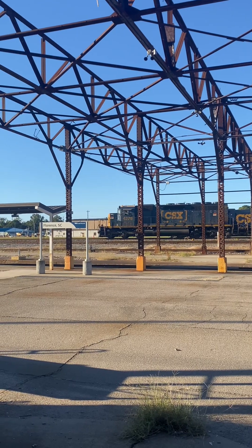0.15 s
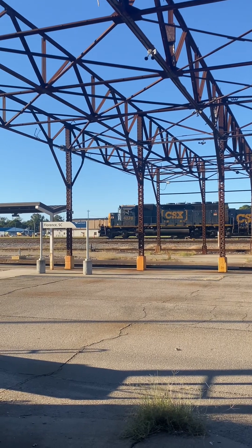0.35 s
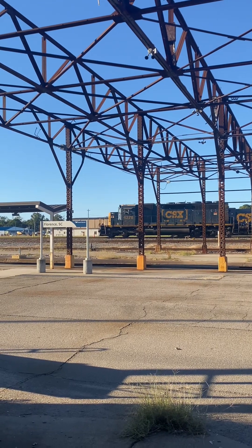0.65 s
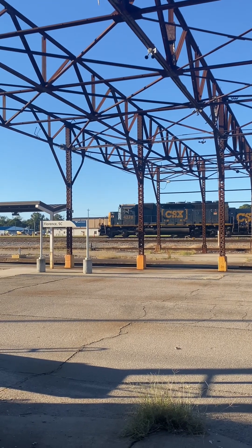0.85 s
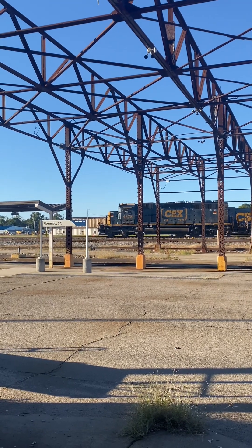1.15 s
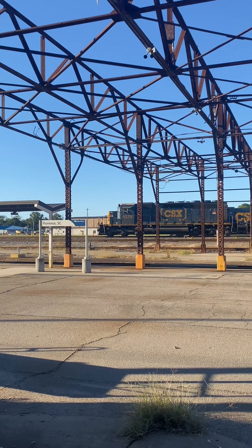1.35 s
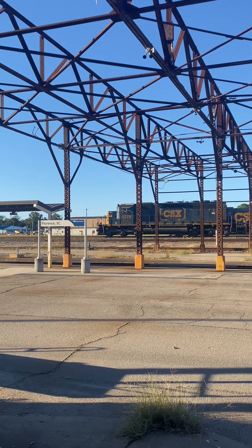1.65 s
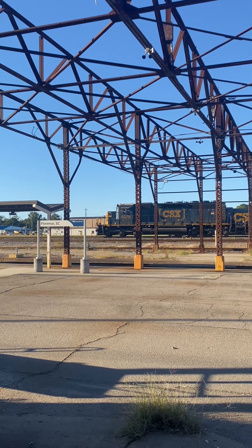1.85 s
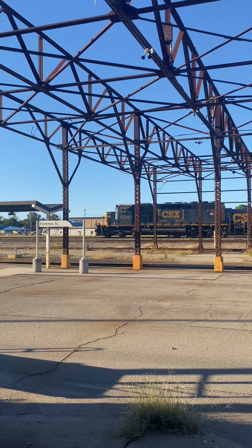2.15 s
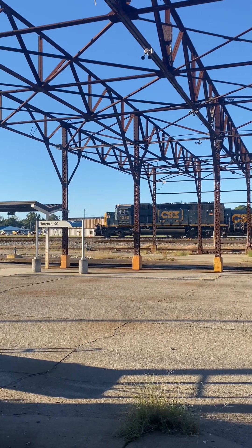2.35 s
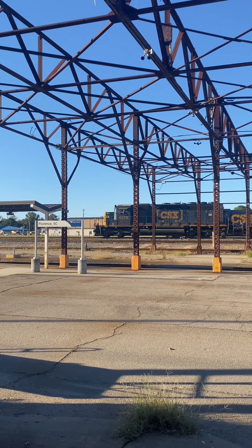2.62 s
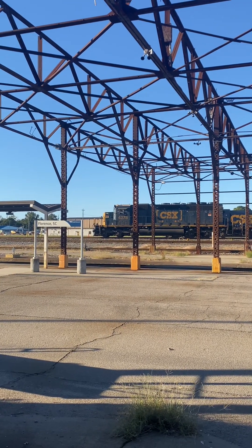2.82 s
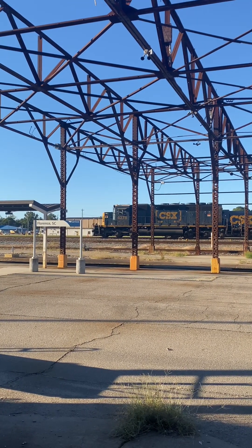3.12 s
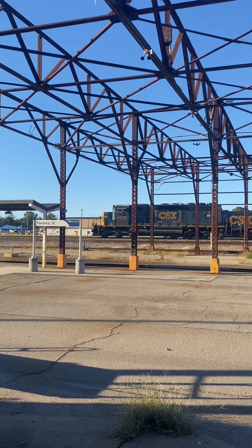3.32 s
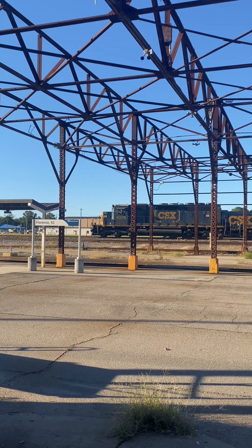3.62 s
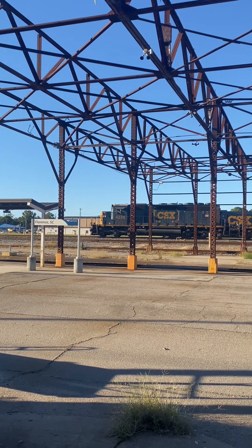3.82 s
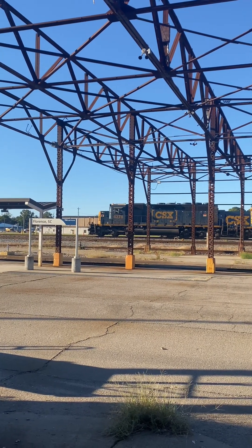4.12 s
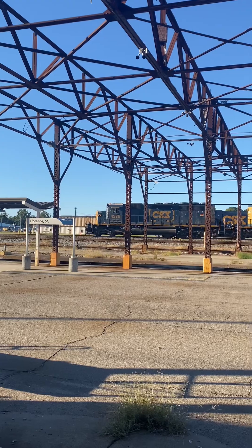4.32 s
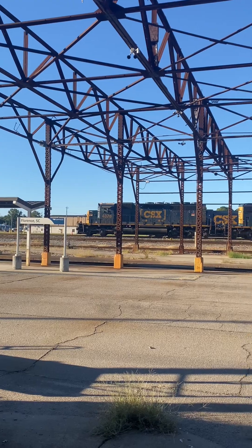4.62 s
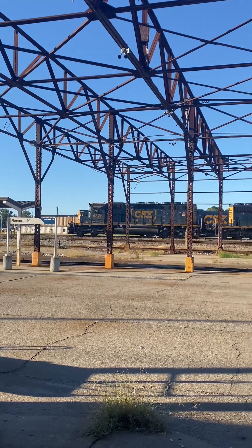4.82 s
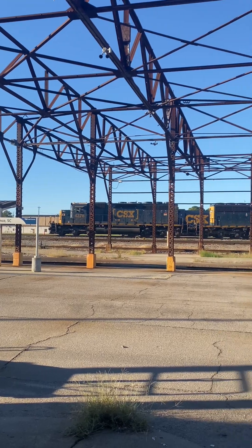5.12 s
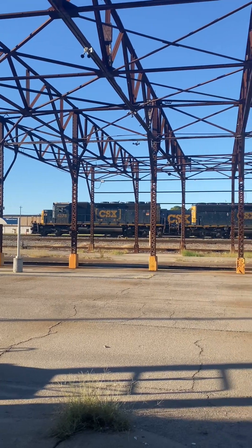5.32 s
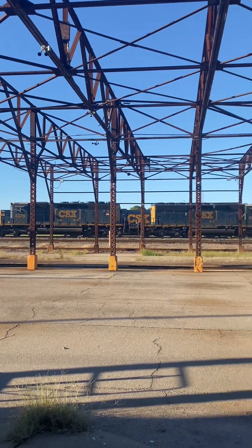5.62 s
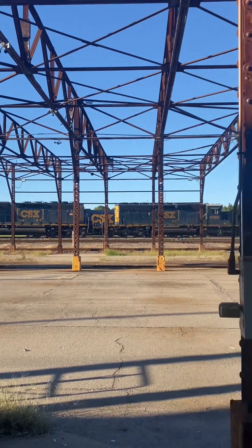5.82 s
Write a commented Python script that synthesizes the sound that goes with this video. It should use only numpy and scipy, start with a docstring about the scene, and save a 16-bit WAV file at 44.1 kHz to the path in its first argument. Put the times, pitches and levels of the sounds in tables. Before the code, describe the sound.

Diesel locomotives idle across an open rail yard, a low throb under a soft roar and a faint, fluttering high whine. Steel scrapes faintly at first, and wind buffets the hand-held phone microphone in gusts. About four seconds in, the bass drops away and an air valve vents once with a brief hoot and an echo. Steel then knocks, scrapes and squeaks, the valve puffs softly twice, and the throb returns.

```python
"""Diesel locomotives idle across an open rail yard: crankshaft orders throb under a roar and gear whines.
From the start steel scrapes and squeaks faintly; wind buffets the two microphone ports of a hand-held
phone, now and then in gusts. Near 4 s the bass drops away and an air valve vents once, its pipe hooting.
Its echo dies away; steel scrapes, knocks and squeaks, the valve puffs twice and the throb returns."""
import sys
import numpy as np
from scipy import signal
from scipy.fft import rfft, irfft, next_fast_len
from scipy.io import wavfile
from scipy.ndimage import uniform_filter1d, minimum_filter1d

SR = 44100
rng = np.random.default_rng(int(sys.argv[2]) if len(sys.argv) > 2 else 0)


def store_pcm(level_fs):
    """Save levels as 16-bit WAV."""
    pcm = np.round(np.clip(level_fs, -1, 1) * 32767).astype(np.int16)
    wavfile.write(sys.argv[1], SR, np.atleast_2d(pcm).T)


N = 263277

# idling speed: time_s, speed_rpm
CRANK_SPEED = [(0, 317.8), (1.5, 318.2), (3.6, 321.7), (4.8, 320.2), (5.97, 318)]
def crank_angle():
    """Phase is the integral of speed: the crankshaft angle in radians."""
    return 2 * np.pi * np.cumsum(curve(CRANK_SPEED) / 60) / SR


# exhaust tones: cycles_per_turn, level_db
EXHAUST_ORDERS = [(8, -22), (9, -39), (12, -38), (13, -40), (15, -22), (16, -33), (17, -33.5), (18, -38),
                  (19, -39), (22, -47), (24, -48), (25, -46), (29, -45), (31, -43)]
# the bass drops away around the air blast and returns: time_s, gain_db
BASS_GAIN = [(0, -0.5), (3.6, 1), (3.8, -6), (3.92, -24), (4.25, -8), (4.65, -14), (4.85, -5.5),
             (5.05, -1), (5.97, 1.5)]
def exhaust():
    """Harmonic series: uneven firing repeats once a turn, giving tones at multiples of the crank rate."""
    strong_firing_s, stack_order = .08, 15
    angle = crank_angle()
    angle -= angle[round(strong_firing_s * SR)]
    waver, tones = wander(5.2), 0
    for order, db in EXHAUST_ORDERS:
        level = gain_of(db + .15 * np.roll(waver, order * SR // 7))
        lag = .13 * (order - stack_order) ** 2  # tones away from the stack resonance lag
        tones += level * np.cos(order * angle - lag + .25 * rng.standard_normal())
    return np.sqrt(2) * tones * gain_of(curve(BASS_GAIN))


# noise of fans, intake and casing: frequency_hz, density_db
ROAR_SPECTRUM = [(30, -33), (60, 9), (110, -3.5), (300, 1), (600, -7), (1300, -11.5), (1700, -17),
                 (2150, -15), (2800, -21), (4200, -24.5), (5600, -31), (7000, -36.5), (9000, -42),
                 (11500, -48), (15000, -60.5)]
# its rise and fall: time_s, level_db
ROAR_LEVEL = [(0, -34), (1.5, -33.5), (2, -35.5), (3.4, -34), (3.8, -37.5), (4.5, -39.5), (5, -32),
              (5.5, -34), (5.97, -36.5)]
# hollows of the casing: pitch_hz, bandwidth_hz, gain_db
CASING_MODES = [(2150, 96, -28), (2756, 330, -26.5), (3500, 200, -30), (5390, 370, -36.5)]
def roar():
    """Cavity resonance: broadband machine noise rings a few hollows of the casing."""
    noise = coloured(ROAR_SPECTRUM, patchy_db=1.5)
    rings = resonances(noise, CASING_MODES, passes=2)
    return (noise + rings) * gain_of(curve(ROAR_LEVEL) + .73 * wander(7.1))


# the blower whine comes forward in short chirps: time_s, level_db
WHINE_CHIRPS = [(.05, -38), (.22, -48), (.35, -38), (.5, -42), (.63, -42), (.75, -44), (.95, -44.5),
                (1.08, -45), (1.2, -40), (1.38, -41.5), (1.58, -36.5), (1.76, -37.5), (2.0, -39.5),
                (2.25, -48.5), (2.6, -39), (2.75, -44), (2.89, -37.5), (3.07, -36), (3.29, -32),
                (3.43, -42), (3.54, -37.5), (4.45, -41), (4.73, -35), (4.94, -36), (5.08, -43), (5.29, -39),
                (5.46, -43), (5.7, -40), (5.921, -40)]
# the highest whine: time_s, level_db
UPPER_WHINE_LEVEL = [(0, -54), (.3, -57), (.55, -52), (.72, -58), (1.28, -59), (1.45, -55.5), (1.78, -53),
                     (1.9, -60), (2.2, -56.5), (2.55, -55.5), (2.72, -58), (2.88, -54), (3.05, -57),
                     (3.16, -52.5), (3.45, -60), (4.8, -56), (5.55, -58), (5.7, -52.5), (5.97, -55)]
def whines():
    """Modulation: tones geared to the crankshaft flutter in level and phase as they cross moving air."""
    blower_hz, steady_db, chirp_s = 2101, -53, .036
    angle = blower_hz * crank_angle() / (curve(CRANK_SPEED).mean() / 60)
    chirps = swells(*np.transpose(WHINE_CHIRPS), chirp_s, chirp_s)
    chirps = uniform_filter1d(chirps, size=round(.08 * SR))
    level = np.hypot(gain_of(steady_db), chirps)
    flutter = unit_rms(gain_of(2.2 * wander(45)))
    out = np.sqrt(2) * level * flutter * np.sin(angle + .45 * wander(25))
    for ratio, db in (.4, -57), (2.126, curve(UPPER_WHINE_LEVEL)):  # companions below and above
        flutter = gain_of(3.2 * wander(16))
        out += gain_of(db) * unit_rms(flutter * np.sin(ratio * angle + 1.2 * wander(18)))
    return out


# the valve cracks, pops open and shuts: time_s, level_db, hiss_share
VALVE_BLAST = [(3.825, -64, 0.93), (3.84, -48, 0.99), (3.87, -34.5, 0.93), (3.945, -26, 0.7),
               (3.949, -17.5, 0.3), (3.99, -15.5, 0.04), (4.04, -19.5, 0.4), (4.07, -25, 0.4),
               (4.12, -32.5, 0.1), (4.2, -39.5, 0.2), (4.3, -91, 0.2)]
# valve wide open: frequency_hz, density_db
RUSH_SPECTRUM = [(300, -17.5), (700, -8.5), (900, -0.5), (1150, -1.5), (1500, -8), (2000, -10), (2300, -9),
                 (2720, -4.5), (3300, -10), (5500, -14.5), (7500, -14), (12000, -33), (15000, -38.5)]
# valve just cracked: frequency_hz, density_db
HISS_SPECTRUM = [(300, -20.5), (1300, -5.5), (2800, -5), (4200, -5), (5800, -2), (9000, -9), (12000, -18.5),
                 (15000, -28)]
# resonances of the pipe: pitch_hz, bandwidth_hz, gain_db
PIPE_MODES = [(2690, 50, -17.5), (2010, 130, -7.5)]
# small leaks: time_s, level_db
VALVE_PUFFS = [(.35, -54.5), (4.77, -47.5), (5.415, -50)]
def air_valve():
    """Turbulent jet noise: a narrow gap hisses, a wide one gives a fuller rush that rings the pipe."""
    level_db, hiss_share = curve(VALVE_BLAST)
    level = gain_of(level_db) * (level_db > -60)  # silent while shut
    rush = coloured(RUSH_SPECTRUM, patchy_db=-.5)
    rush = unit_rms(rush + resonances(rush, PIPE_MODES))
    puffs = swells(*np.transpose(VALVE_PUFFS), rise_s=.015, fall_s=.047)
    hiss = (np.sqrt(hiss_share) * level + puffs) * coloured(HISS_SPECTRUM, patchy_db=1.5)
    return (hiss + np.sqrt(1 - hiss_share) * level * rush) * gain_of(.25 * wander(60))


# a sinking tone at the height of the blast: time_s, pitch_hz, level_db
HOOT_GLIDE = [(3.944, 1216, -60), (3.949, 1182, -23.5), (3.966, 1102, -36), (3.977, 1004, -20),
              (3.993, 980, -21.5), (4.005, 925, -26), (4.05, 900, -60)]
def pipe_hoot():
    """Pipe resonance: the valve pipe sounds one tone, made breathy by random phase modulation."""
    hz, db = curve(HOOT_GLIDE)
    phase = 2 * np.pi * np.cumsum(hz) / SR + .8 * wander(60)
    return np.sqrt(2) * gain_of(db) * (db > -59) * np.sin(phase)


# colour shared by the scrapes and the echo: frequency_hz, density_db
SCRAPE_AND_ECHO_SPECTRUM = [(300, -18.5), (800, 5.5), (1200, -2.5), (1800, 0), (2700, -2), (3800, -9),
                            (5500, -14), (8000, -27.5), (15000, -53)]
# scrapes of steel and, at 4.05 s, the air blast's echo across the yard: time_s, level_db, rise_s, fall_s
SCRAPE_AND_ECHO_SWELLS = [(.34, -37.5, .04, .15), (.475, -35.5, .015, .13), (1.1, -40, .15, .3),
                          (4.05, -28, .05, .45), (4.48, -35.5, .015, .08), (4.629, -33.5, .003, .035),
                          (4.7, -34.5, .02, .1), (4.77, -30.5, .06, .1), (4.9, -42, .01, .1),
                          (5.022, -39, .004, .06), (5.12, -39, .08, .13), (5.408, -32.5, .003, .08)]
# squeaks and faint squeals: start_s, pitch_hz, level_db, length_s
SLIP_SQUEAKS = [(.307, 6300, -60, .13), (0.324, 1465, -42, .07), (.37, 790, -42, 0.19),
                (.47, 3830, -52, 0.097), (.56, 797, -46, .06), (.98, 4134, -60, 0.55),
                (1.0, 2860, -50, 0.36), (2.906, 3670, -57, 0.89), (2.658, 2790, -54, 0.22),
                (3.168, 2780, -53, 0.44), (4.05, 2744, -44, 0.34), (4.276, 4130, -52, 0.17),
                (4.7, 1205, -39, 0.066), (4.72, 2340, -37, 0.18), (4.761, 1806, -35, 0.035),
                (4.811, 3220, -42, 0.046), (4.894, 1790, -39, 0.057), (5.016, 2010, -39, 0.06),
                (5.02, 2630, -43, .05), (5.082, 2040, -37, .025), (5.09, 754, -36, 0.11),
                (5.34, 2480, -40, 0.058), (5.402, 5233, -54, 0.059), (5.448, 5013, -52, 0.065)]
def scrapes_and_echo():
    """Sliding friction: steel rubs and squeaks; one long fade of the same noise is the blast's echo."""
    level = np.hypot(gain_of(-54), swells(*np.transpose(SCRAPE_AND_ECHO_SWELLS)))  # over a faint bed
    out = coloured(SCRAPE_AND_ECHO_SPECTRUM, patchy_db=2) * level * gain_of(.25 * wander(59))
    slip = wander(50)
    for start_s, hz, db, length_s in SLIP_SQUEAKS:
        t = np.arange(round(length_s * SR)) / SR
        at = slice(round(start_s * SR), round(start_s * SR) + len(t))
        envelope = np.sin(np.pi * (t / length_s) ** .7) ** 2  # swells faster than it fades
        out[0, at] += np.sqrt(2) * gain_of(db) * envelope * np.sin(2 * np.pi * hz * t + .8 * slip[at])
    return out


# knocks of steel on steel: start_s, peak_db
STEEL_KNOCKS = [(.47, -35.5), (4.474, -31.5), (4.629, -21.5), (4.691, -30.5), (4.764, -22.5), (4.898, -33),
                (5.02, -27.5), (5.406, -27.5)]
# what they ring: pitch_hz, level_db, t60_s
STEEL_MODES = [(1810, 0.5, 0.059), (2520, -0.5, .04), (2760, 0, 0.042), (2980, 0, .04), (3320, -7.5, 0.056),
               (4120, -8, .04), (4840, -16.5, 0.019)]
def knocks():
    """Damped free vibration: each impact rings the same modes of the steel, each at a random strength."""
    t, out = np.arange(4096)[:, None] / SR, np.zeros(N)
    hz, mode_db, t60_s = np.transpose(STEEL_MODES)
    for start_s, db in STEEL_KNOCKS:
        struck_db = mode_db + 2.5 * rng.standard_normal(len(hz))
        blow = (gain_of(struck_db - 60 * t / t60_s) * np.sin(2 * np.pi * hz * t)).sum(1)
        out[round(start_s * SR):][:4096] += gain_of(db) * blow / abs(blow).max()
    return out


# the breeze between gusts: time_s, alike_db, opposed_db
BREEZE_LEVEL = [(0, -40, -50.5), (.5, -31.5, -44), (1.0, -32.5, -35), (1.4, -32.5, -28), (1.8, -48, -24),
                (2.2, -29.5, -36), (2.6, -34, -44), (3.0, -29, -38.5), (3.35, -50.5, -27), (3.75, -24, -25),
                (4.1, -28.5, -36), (4.4, -32, -29), (4.6, -43, -41), (5.0, -44, -37), (5.2, -26.5, -31.5),
                (5.6, -28, -30), (5.97, -28.5, -33.5)]
# gusts and heaves of wind, some only millisecond blips of low noise (widths of 0 or less become 1 ms):
# time_s, gust_db, heave_db, nominal_width_s
GUSTS_AND_BLIPS = [(1.0, -30, -46, 0.2), (1.99, -23, -26, .02), (2.122, -20.5, -24.5, 0.11),
                   (3.09, -19.5, -15.5, 0.08), (3.43, -43, -23, 1.65), (3.56, -12, -13, 0.0026),
                   (3.585, -21, -19, -0.08), (3.639, -27, -20, -0.08), (3.821, -13.5, -17, -0.08),
                   (3.86, -28, -7, -0.0355), (4.04, -15, -39, 0), (4.16, -24.5, -42, 0.1),
                   (4.217, -24, -13.5, -0.05), (4.395, -18.5, -35, 0.05), (4.62, -23, -40, 0.14),
                   (5.66, -23.5, -13, 0.04), (5.748, -12.5, -16, 0.0143), (5.84, -25.5, -15, 0.04),
                   (5.911, -22, -15, 0)]
# pressure of gusts, heaves and eddies: frequency_hz, density_db
GUST_SPECTRUM = [(28, -46.5), (45, -7), (70, 10.5), (110, 4), (200, -4), (400, -10.5), (900, -39),
                 (2500, -110)]
HEAVE_SPECTRUM = [(28, -58), (42, -19), (60, -1), (85, -1), (115, -13), (200, -39), (600, -110)]
EDDY_SPECTRUM = [(12, -48.5), (20, -19), (59, -1), (86, -2), (327, -10), (454, -13.5), (519, -17.5),
                 (667, -19.5), (2000, -47.5), (2600, -80.5), (4400, -120)]
def wind():
    """Turbulent pressure: gusts, heaves, blips and buffets are in phase at the ports, eddies opposed."""
    alike_db, opposed_db = curve(BREEZE_LEVEL)
    time_s, gust_db, heave_db, nominal_width_s = np.transpose(GUSTS_AND_BLIPS)
    flanks = nominal_width_s, .59 * nominal_width_s  # a gust dies faster than it grows
    lumpy_breeze = gain_of(alike_db + 3 * wander(13))
    deep_breeze = gain_of(opposed_db + 2.5 + curve(BASS_GAIN))  # dips as all the bass drops away
    gusts = np.hypot(lumpy_breeze, swells(time_s, gust_db, *flanks))
    heaves = np.hypot(deep_breeze, swells(time_s, heave_db, *flanks))
    alike = coloured(GUST_SPECTRUM)[0] * gusts + coloured(HEAVE_SPECTRUM)[0] * heaves + buffets()
    opposed = coloured(EDDY_SPECTRUM)[0] * unit_rms(gain_of(4 * wander(25))) * gain_of(opposed_db)
    lowpass = signal.butter(4, 1500, fs=SR, output="sos")  # eddies carry no treble
    return signal.sosfilt(lowpass, [alike + opposed, alike - opposed])


# single buffets of wind: start_s, peak_db, final_pitch_hz, time_scale_s
WIND_BUFFETS = [(1.976, -22, 198, 0.016), (2.107, -9.5, 245, 0.015), (2.116, -1.5, 124.7, 0.016),
                (3.036, -20.5, 228, 0.014), (3.523, -12, 121.5, 0.015), (3.531, -8.5, 321, 0.013),
                (3.553, -15, 262, 0.0163), (3.543, -8, 74, 0.023), (3.555, -8, 62.4, .028),
                (3.571, -12, 223, 0.012), (3.609, -12, 111, 0.013), (3.628, -7.5, 59, .03),
                (3.675, -21, 109, 0.018), (3.715, -14.5, 53, 0.053), (3.828, -7.5, 66.6, 0.05),
                (4.204, -15, 155, 0.016), (4.225, -11, 288, 0.0044), (4.367, -14.5, 198, 0.022),
                (4.387, -10.5, 333.6, 0.0151), (4.412, -9.5, 420, 0.0058), (4.447, -20, 230, 0.0085),
                (4.57, -19.5, 197, 0.014), (4.603, -22.5, 279, 0.022), (5.094, -25, 287, 0.018),
                (5.744, -23, 192, 0.023), (5.776, -16, 177, 0.017), (5.882, -18.5, 140, 0.023)]
def buffets():
    """Vortex convection: an eddy tumbles past as a pulse of falling pitch, roughened by smaller eddies."""
    out = np.zeros(N)
    for start_s, db, hz, scale_s in WIND_BUFFETS:
        age = np.arange(4096) / SR / scale_s
        falling_hz = hz * (1 + 1.603 * np.exp(-age / .23))
        tumble = np.sin(2 * np.pi * np.cumsum(falling_hz) / SR)
        band = signal.butter(3, [.41 * hz, 2.005 * hz], "band", fs=SR, output="sos")
        roughness = unit_rms(signal.sosfilt(band, rng.standard_normal(8192))[4096:])
        pulse = (tumble + .55 * roughness) * age * np.exp(-2.5 * age)
        part = out[round(start_s * SR):][:4096]
        part += gain_of(db) * pulse[:len(part)] / abs(pulse).max()
    return out


# phase lead of the left port: frequency_hz, lead_half_turns
PORT_LEAD = [(100, 0), (860, -.1), (1200, -.03), (3400, .05), (4500, .18), (5100, .06), (5800, .3),
             (6950, 1), (7750, 1), (9000, 1.55), (9750, 2), (11300, 2), (12400, 3), (14200, 3),
             (15000, 3.4)]
# further lead for sources to one side: frequency_hz, lead_half_turns
SIDE_LEAD = [(1400, -.04), (2050, 0), (2600, .2), (3250, .07), (4000, .04), (5000, 0)]
# likeness of the ports, lower range and treble: frequency_hz, likeness_ratio
PORT_LIKENESS = [(60, 0.78), (300, 0.97), (700, 0.95), (1300, 0.9), (2000, 0.97), (3000, 1), (4500, 1),
                 (5300, 0.98), (6200, 0.97)]
TREBLE_LIKENESS = [(6900, 1), (8000, 1), (8800, .85), (9700, 1), (15000, 1)]
# balance of the ports: frequency_hz, left_minus_right_db
PORT_BALANCE = [(170, 0), (490, -1.), (1200, -1.5), (2500, -.3), (5000, 0), (15000, 0)]
def ports(direct, scattered, aside):
    """Partial coherence: far sound meets two ports shifted in phase, partly replaced by scattered sound."""
    pad = 2048
    size = next_fast_len(N + 2 * pad)
    hz = np.fft.rfftfreq(size, 1 / SR)
    likeness = spectrum_at(PORT_LIKENESS + TREBLE_LIKENESS, hz)
    lead = spectrum_at(PORT_LEAD, hz) + aside * spectrum_at(SIDE_LEAD, hz)
    half_shift = gain_of(spectrum_at(PORT_BALANCE, hz) / 2) * np.exp(.5j * np.pi * lead)
    common, apart = rfft(padded([direct, scattered], pad), size)
    common *= np.sqrt((1 + likeness) / 2)
    apart *= np.sqrt((1 - likeness) / 2)
    return irfft([(common + apart) * half_shift, (common - apart) / half_shift], size)[:, pad:N + pad]


def gain_of(db):
    """Decibels to amplitude."""
    return 10 ** (np.asarray(db) / 20)


def unit_rms(x):
    """Normalisation to rms 1."""
    return x / np.sqrt(np.mean(np.abs(x) ** 2) + 1e-20)


def padded(pair, samples):
    """Odd reflection extends both ends without a step."""
    return np.pad(pair, [(0, 0), (samples, samples)], "reflect", reflect_type="odd")


def spectrum_at(points, hz):
    """Interpolation on a log-frequency axis."""
    point_hz, value = np.transpose(points)
    return np.interp(np.log(hz + 1), np.log(point_hz + 1), value)


def curve(rows):
    """Linear interpolation in time: each column becomes one value a sample."""
    time_s, *columns = np.transpose(rows)
    return np.squeeze([np.interp(np.arange(N) / SR, time_s, column) for column in columns])


def wander(hz):
    """Low-passed noise: a random drift of rms 1, changing up to about hz times a second."""
    return unit_rms(signal.lfilter(*signal.butter(2, 2 * hz / SR), rng.standard_normal(N + SR))[SR:])


def coloured(spectrum, patchy_db=0):
    """Spectral shaping: two unrelated noises of one colour with shared drifting patches, rms 1."""
    hz = np.fft.rfftfreq(2048, 1 / SR)
    a, b, c, d, patches = rng.standard_normal((N // 512 + 5, 1025, 5)).T
    patches = unit_rms(uniform_filter1d(uniform_filter1d(patches, 16, 0), 6, 1))
    shape = gain_of(spectrum_at(spectrum, hz)[:, None] + patchy_db * patches)
    frames = np.array([a + 1j * b, c + 1j * d]) * shape
    return unit_rms(signal.istft(frames, nperseg=2048, noverlap=1536)[1][:, :N])


def resonances(noise, modes, passes=1):
    """Forced vibration: noise drives a bank of resonators; more passes steepen each peak."""
    out = 0
    for hz, width_hz, db in modes:
        rung = noise
        for _ in range(passes):
            rung = signal.lfilter(*signal.iirpeak(hz, hz / width_hz, SR), rung)
        out += gain_of(db) * unit_rms(rung)
    return out


def swells(time_s, db, rise_s, fall_s):
    """Power summation of swells that gain 10 dB in rise_s and lose it in fall_s (each at least 1 ms)."""
    late_s = np.arange(0, N, 32)[:, None] / SR - time_s
    down_db = 10 * np.maximum(late_s / np.maximum(fall_s, 1e-3), -late_s / np.maximum(rise_s, 1e-3))
    power = (gain_of(db - down_db) ** 2).sum(1)
    return np.repeat(np.sqrt(power), 32)[:N]


def scene():
    """Superposition: far machines heard through the two ports, exhaust and wind added directly."""
    engine_direct, engine_scattered = roar()
    yard_direct, yard_scattered = air_valve() + scrapes_and_echo()
    yard_scattered *= gain_of(6)  # the steel frame overhead scatters the sharper sounds more
    yard = ports(yard_direct + knocks() + pipe_hoot(), yard_scattered, aside=True)
    engine = ports(engine_direct + whines(), engine_scattered, aside=False)
    return engine + yard + exhaust() + wind()


def record(dry):
    """Peak limiting, then band limiting: the gain dips smoothly at peaks and the top treble is cut."""
    ceiling, span, cutoff_hz = .88, round(.012 * SR), 15150
    safe_gain = np.minimum(ceiling / (abs(dry).max(0) + 1e-9), 1)
    limited = dry * uniform_filter1d(minimum_filter1d(safe_gain, size=2 * span), size=span)
    lowpass = signal.firwin(511, cutoff_hz, window=("kaiser", 9), fs=SR)
    return signal.oaconvolve(padded(limited, 255), lowpass[None], "valid")


dry = scene()
out = record(dry)
store_pcm(out)
```